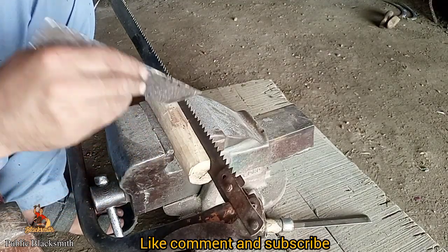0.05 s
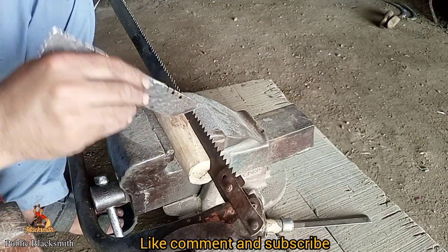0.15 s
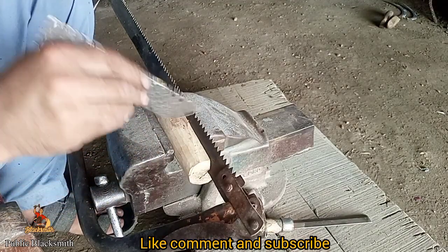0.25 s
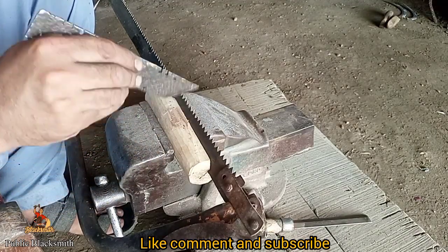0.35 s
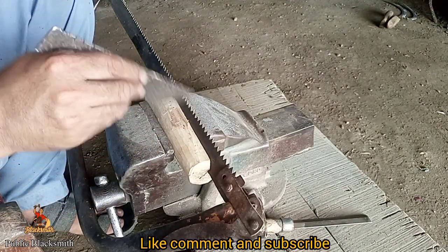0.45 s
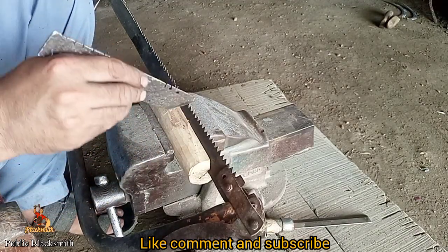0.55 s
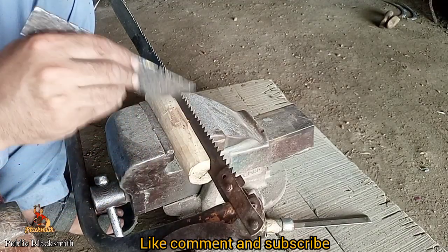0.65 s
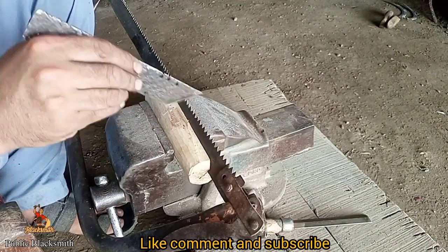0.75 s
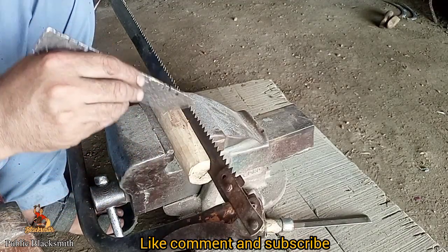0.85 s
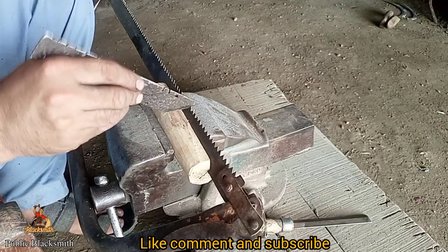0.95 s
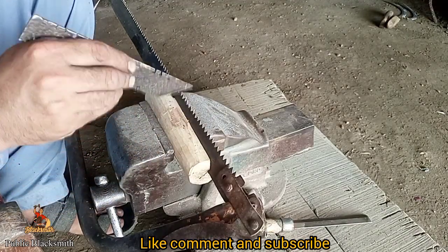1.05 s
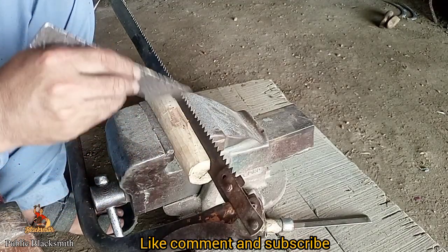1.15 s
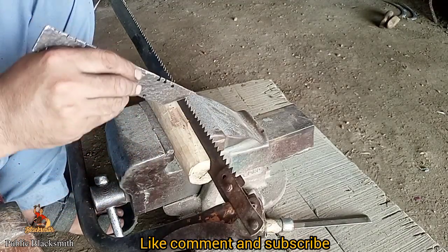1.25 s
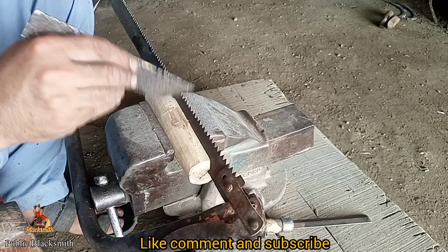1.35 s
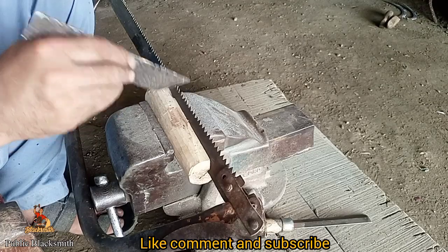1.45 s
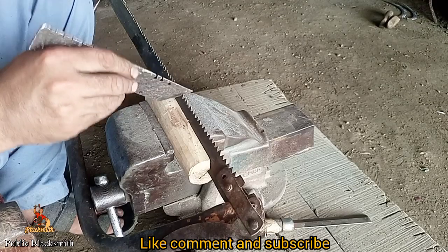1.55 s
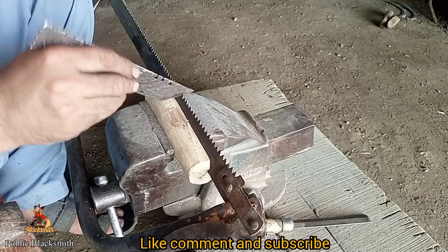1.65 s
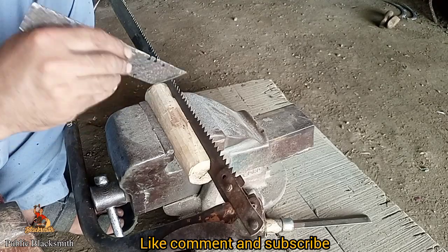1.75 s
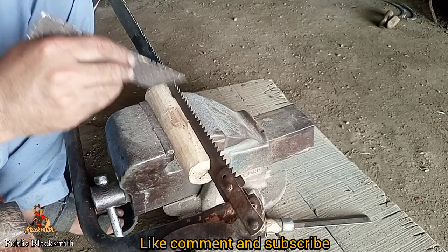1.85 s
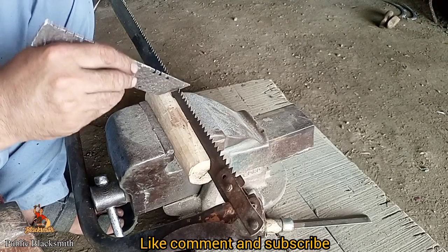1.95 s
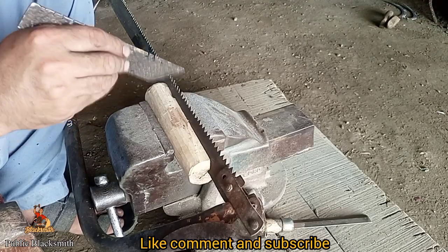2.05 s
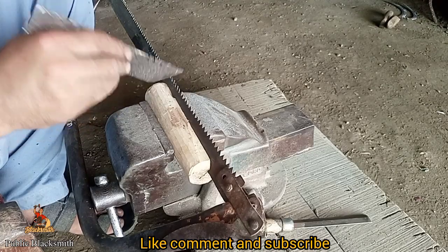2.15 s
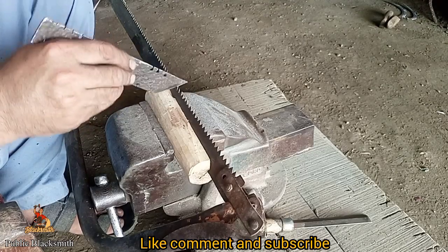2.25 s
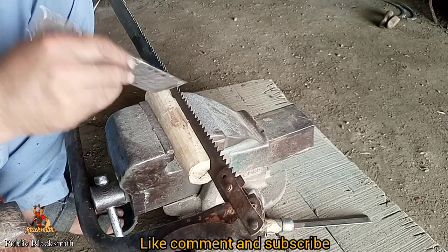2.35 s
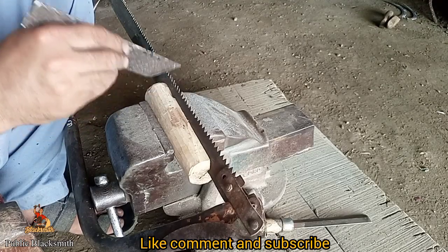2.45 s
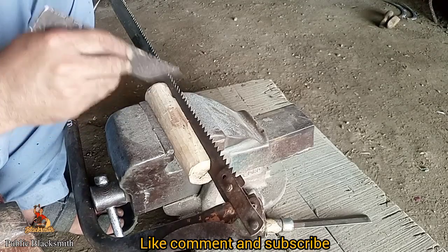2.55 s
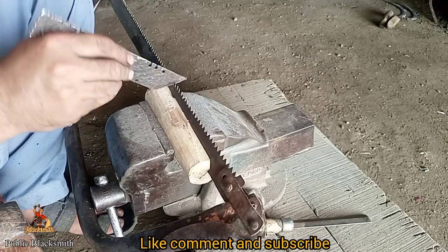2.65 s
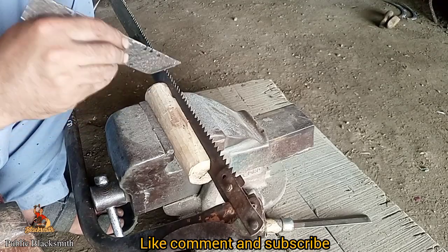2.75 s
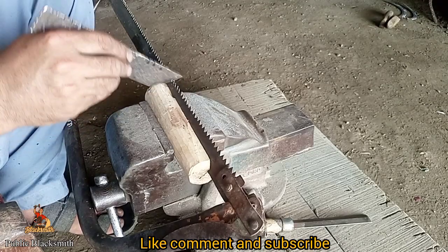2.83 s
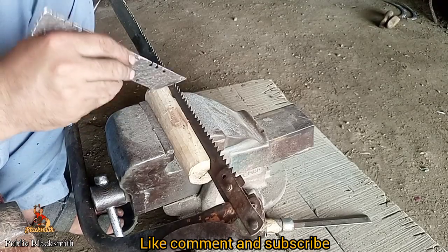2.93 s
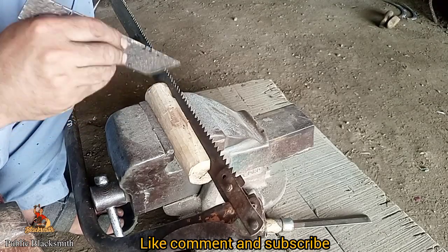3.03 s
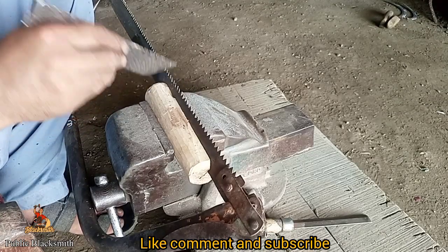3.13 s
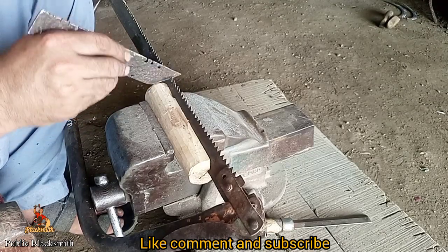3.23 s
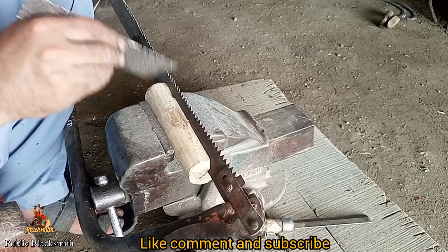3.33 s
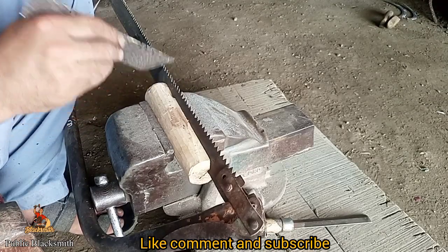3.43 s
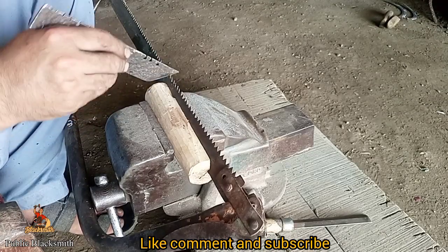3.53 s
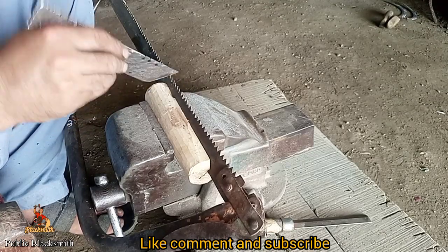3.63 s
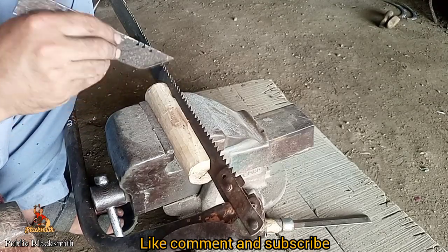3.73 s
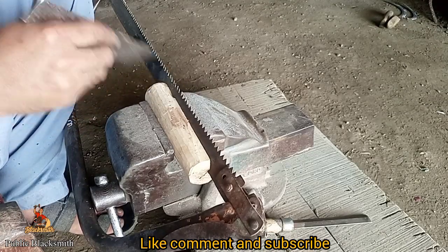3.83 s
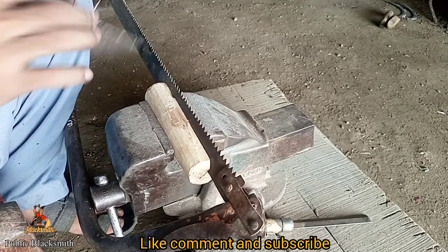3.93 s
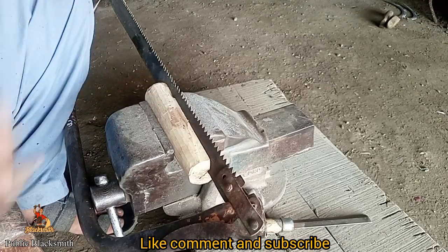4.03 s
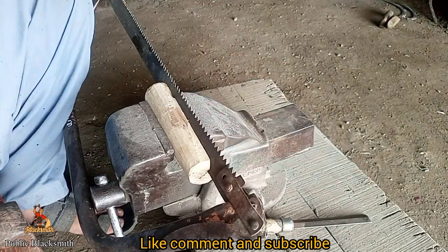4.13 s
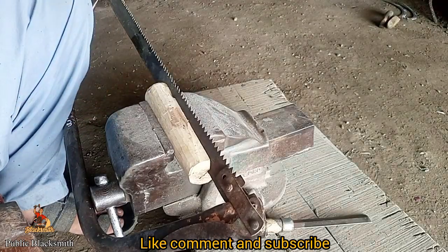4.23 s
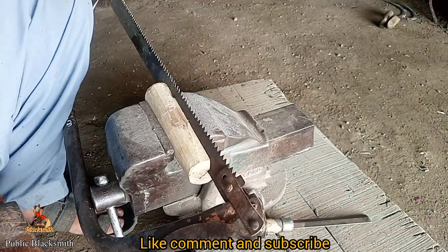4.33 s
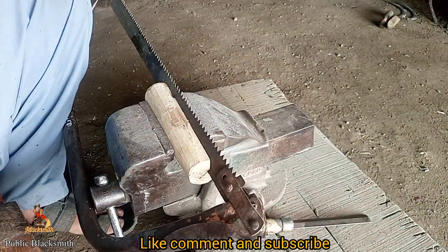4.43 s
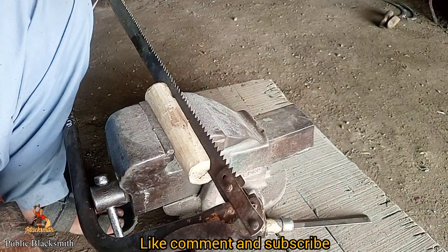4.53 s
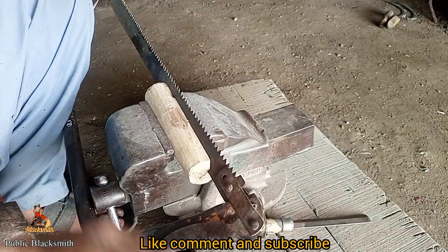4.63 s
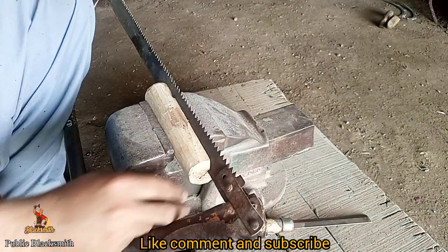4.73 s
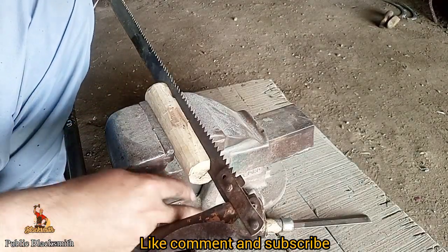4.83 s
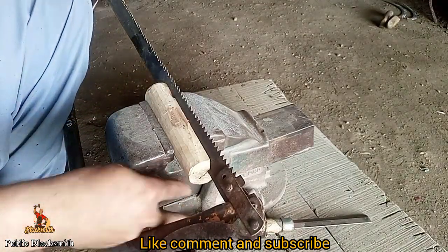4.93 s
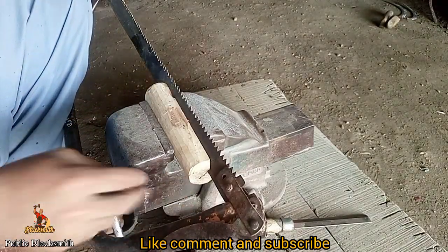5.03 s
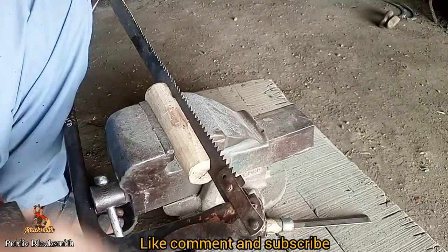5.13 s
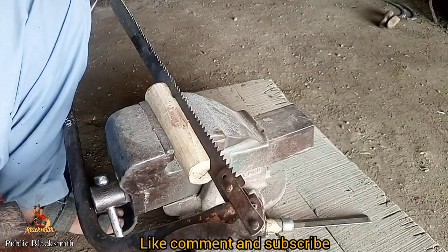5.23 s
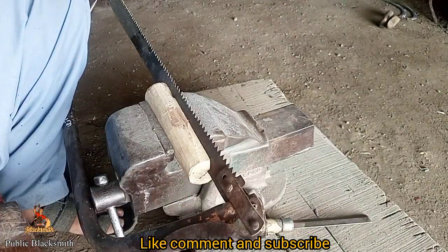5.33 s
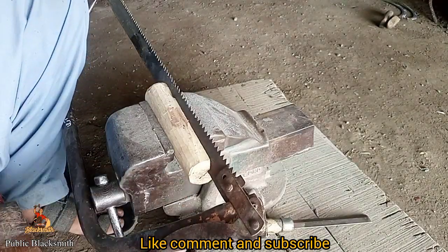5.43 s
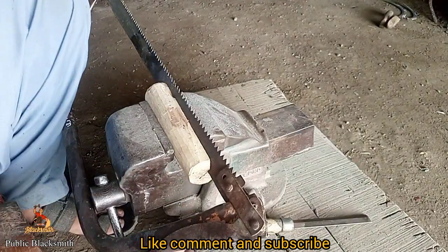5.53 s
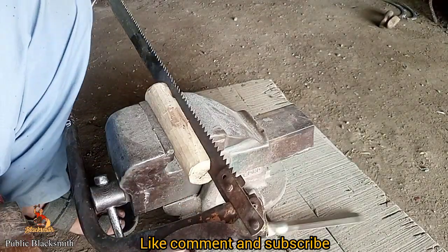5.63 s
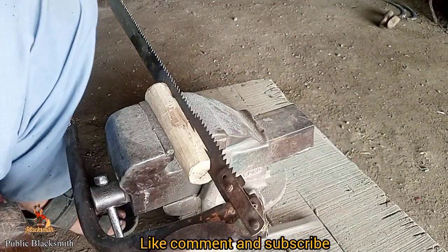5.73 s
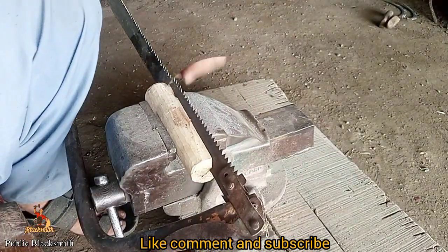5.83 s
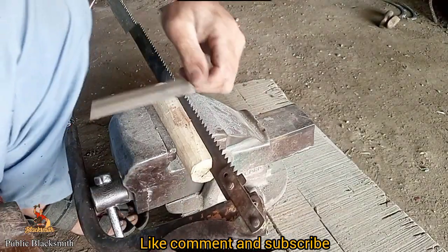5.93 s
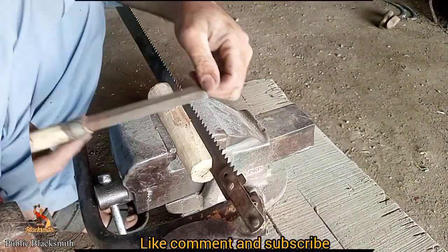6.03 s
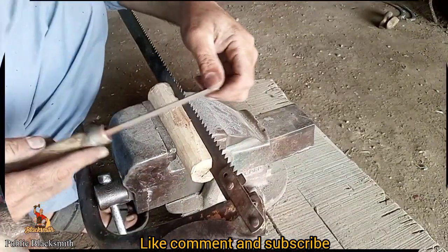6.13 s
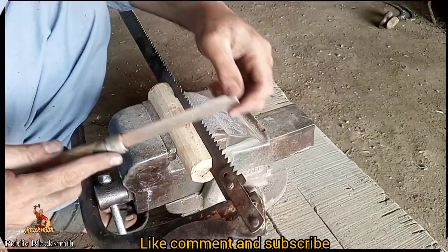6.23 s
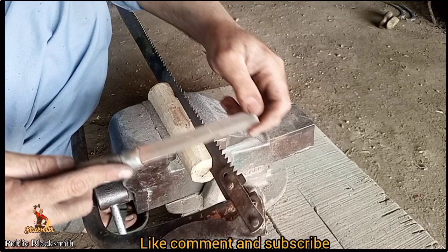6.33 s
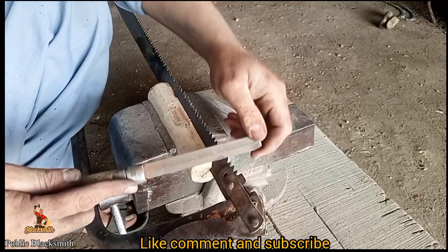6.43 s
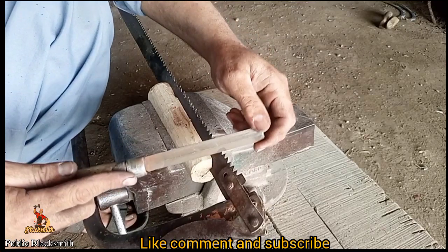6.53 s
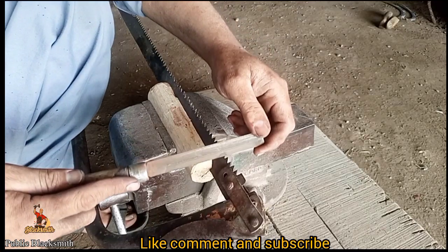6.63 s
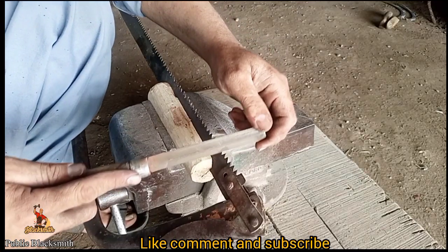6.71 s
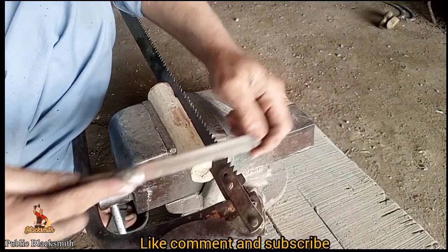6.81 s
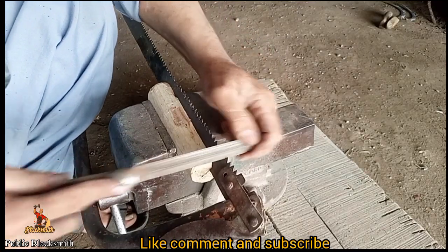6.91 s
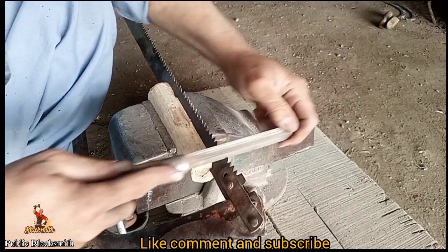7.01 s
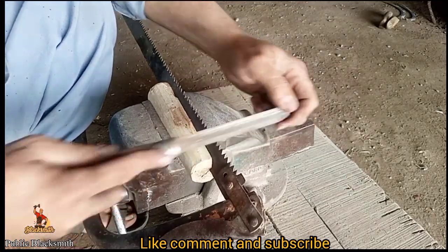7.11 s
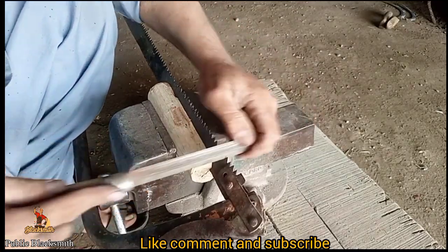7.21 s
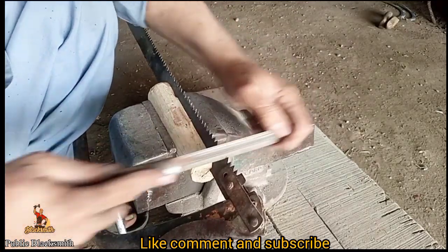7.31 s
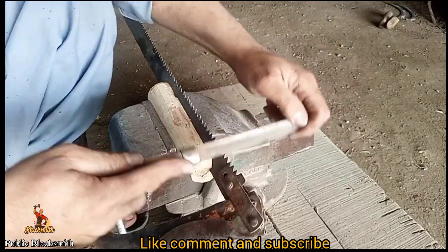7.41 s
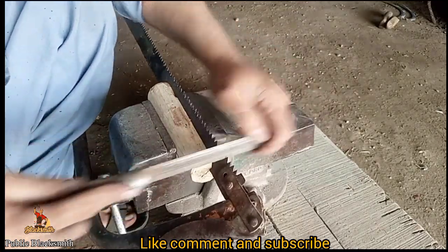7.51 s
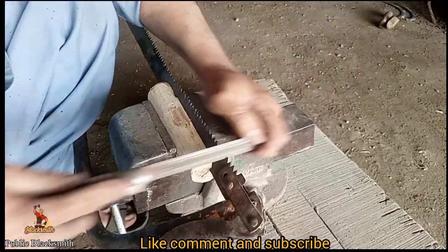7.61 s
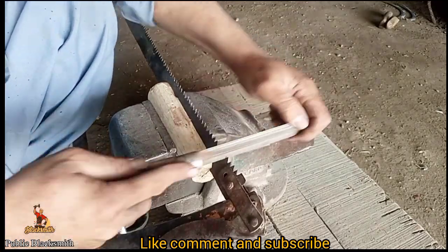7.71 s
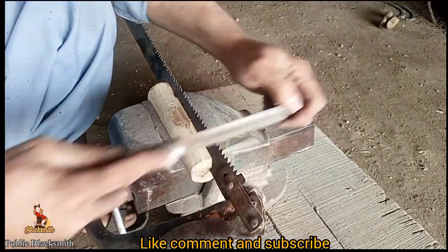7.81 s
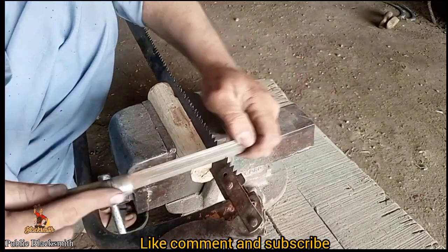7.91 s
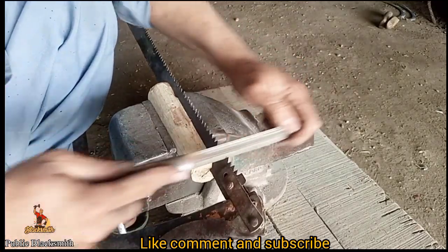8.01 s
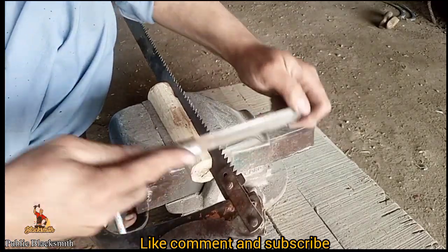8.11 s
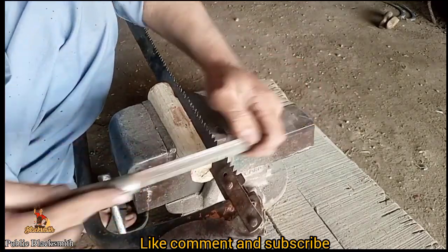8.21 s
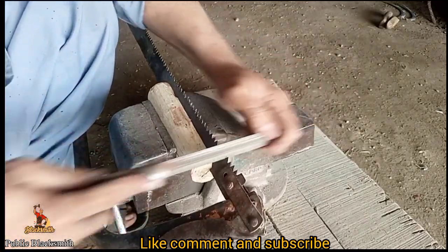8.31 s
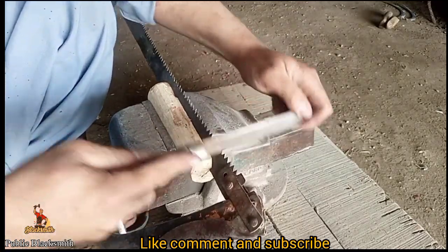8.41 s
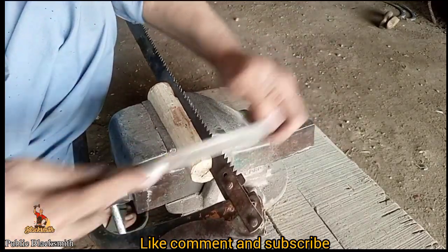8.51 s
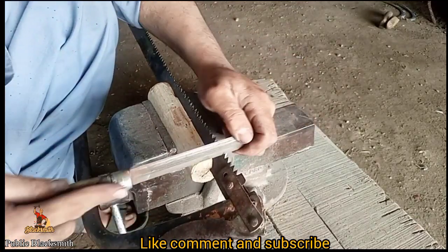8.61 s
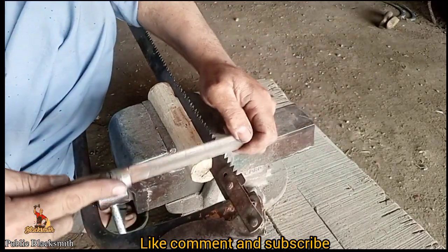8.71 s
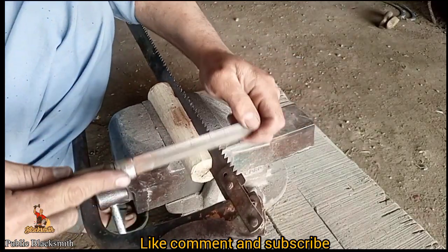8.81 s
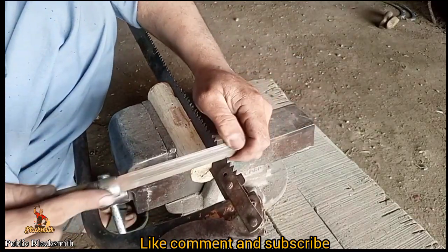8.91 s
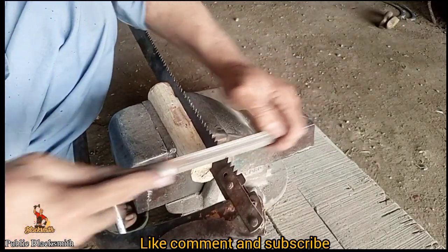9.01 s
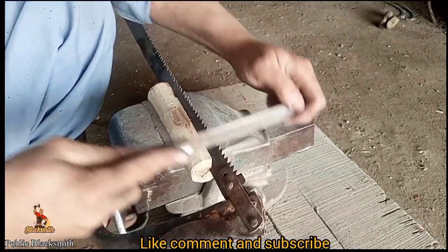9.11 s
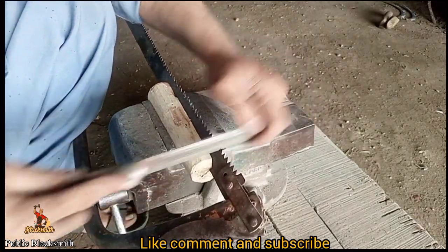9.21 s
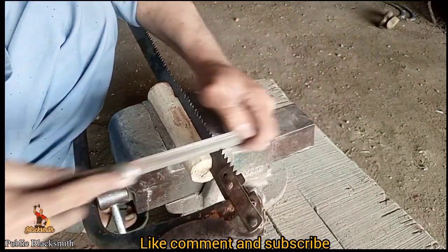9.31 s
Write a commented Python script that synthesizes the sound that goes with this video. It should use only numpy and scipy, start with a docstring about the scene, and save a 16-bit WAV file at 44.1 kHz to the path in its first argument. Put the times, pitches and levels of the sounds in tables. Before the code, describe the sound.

Quick gritty metal scratches tick steadily over a clamped saw blade, then a short clatter on the bench and slower, softer paired file rasps.

```python
"""Distant traffic, two wandering bands of low noise, rumbles under a small microphone's hiss throughout.
A flat steel plate pecks along the teeth of a saw held in a vice, each landing followed by a light drag: bursts of grit
ring the steel's modes, and slower low tones of the blade swell after each landing. A small tool rattles down on
the bench and a file is picked up, as short blows on their own modes. The file then lands on the teeth and is
pushed across them in longer bursts of grit. Gain control follows the recent power."""
import sys
import numpy as np
from scipy import signal
from scipy.fft import rfft, irfft
from scipy.io import wavfile
from scipy.ndimage import map_coordinates

SR = 44100
rng = np.random.default_rng(int(sys.argv[2]) if len(sys.argv) > 2 else 0)


def field_ratio(decibels):
    """Amplitude ratio for a level in dB (20 dB per decade); scalars and array-likes work."""
    return 10 ** (np.asarray(decibels, dtype=float) / 20)


def waveform_to_disk(signal):
    """Save audio, clipped to [-1, 1], as 16-bit WAV at the path in sys.argv[1]."""
    frames = np.transpose(np.atleast_2d(signal))
    scaled = np.clip(frames, -1, 1) * 32767
    samples = np.round(scaled).astype(np.int16)
    wavfile.write(sys.argv[1], SR, samples)


N = 412776
CONTACT_SIZE = 2 ** 14  # samples in one contact or tone

# plate lands on a tooth: start_s, level_db, rise_s, hold_s, fall_t60_s
PECKS = [(.032, -31.5, 0.0071, 0, 0.099), (.176, -31, 0.0027, 0.0005, 0.095),
         (.313, -31, .0034, 0.00056, 0.11), (0.446, -35, 0.0071, .0074, .091),
         (.591, -36, .0023, 0.019, .076), (.733, -29.5, 0.0053, 0, 0.1), (0.871, -38.5, 0.0078, 0, 0.073),
         (1.014, -35.5, .0026, 0.015, 0.062), (1.15, -30.5, .0036, 0, 0.085),
         (1.283, -35, 0.0067, 0.0058, .12), (1.432, -35, 0.0035, 0.0095, 0.078),
         (1.576, -34.5, 0.0056, .0053, 0.077), (1.709, -31, 0.005, 0.00029, 0.11),
         (1.861, -32.5, .0051, 0, .08), (1.996, -38, .014, 0.0016, .058),
         (2.144, -37.5, 0.0062, 0.0057, 0.13), (2.286, -32, 0.0067, 0, 0.069),
         (2.43, -35.5, .0026, 0.0065, 0.071), (2.565, -35, 0.0066, 0.00044, .089),
         (2.7, -36, 0.0022, 0.011, 0.07), (2.843, -34.5, 0.0056, 0.0021, 0.096),
         (3.001, -34, .0033, 0.009, 0.052), (3.141, -32, 0.0034, 0.0024, 0.077),
         (3.273, -35.5, 0.0083, .011, 0.063), (3.411, -33, 0.0061, 0.0057, 0.086),
         (3.563, -42, 0.005, 0.003, 0.082), (3.697, -42, 0.016, 0, 0.092), (3.83, -36, 0.0027, .016, 0.13)]
# file is pushed across the teeth: start_s, level_db, rise_s, hold_s, fall_t60_s
STROKES = [(6.969, -36.5, 0.054, 0.0094, 0.2), (7.319, -46, 0.052, 0.058, 0.13),
           (7.654, -44.5, 0.07, 0.043, 0.14), (8.013, -46.5, .022, 0.09, .2),
           (8.347, -46, 0.038, 0.067, .15), (8.627, -37.5, 0.0052, 0.025, .12),
           (9.005, -46, 0.072, 0.057, 0.13)]
# file is set down on the teeth: start_s, level_db, rise_s, hold_s, free_end_tone_db
LANDINGS = [(6.111, -48.5, 0.011, .001, -89), (6.882, -42.5, 0.011, 0.04, -64),
            (7.259, -40, 0.0015, 0.014, -77), (7.596, -42, 0.0089, 0.018, -51),
            (7.935, -38.5, .006, 0.023, -59), (8.28, -37, .0028, 0.0027, -59),
            (8.6, -41, 0.0046, 0.0079, -50.5), (8.933, -39.5, 0.0037, .001, -64),
            (9.291, -37.5, .018, 0.015, -72)]
# dense response between the modes, plate and file handle: pitch_hz, relative_level_db
DENSE_STEEL = [(200, -49), (350, -23), (620, -23), (850, -6.5), (1130, -16.5), (1290, -1.5), (1830, -12),
               (4170, -3), (7000, -6.5), (8200, -19.5), (12600, -28.5), (14200, -34), (15200, -20),
               (15800, -47.5)]


def unit(x):
    """Scaled to rms 1."""
    return x / np.sqrt(np.mean(x ** 2) + 1e-20)


def along(points, hz):
    """Interpolates (Hz, value) points on a log frequency axis."""
    f, v = np.transpose(points)
    return np.interp(np.log(hz + 1), np.log(f + 1), v)


def place(table, s):
    """Columns of a table interpolated at one moment."""
    at, *cols = np.transpose(table)
    return [np.interp(s, at, c) for c in cols]


def wobble(rate, size=N):
    """A smooth random curve, rate knots a second."""
    knots = rng.standard_normal(int(size * rate / SR) + 4)
    return map_coordinates(knots, [np.arange(size) * rate / SR])


def coloured(spectrum):
    """Steady noise of rms 1, shaped by (Hz, dB) points."""
    gain = field_ratio(along(spectrum, np.fft.rfftfreq(N, 1 / SR)))
    return unit(irfft(rfft(rng.standard_normal(N)) * gain, N))


def causal(gain_db):
    """Minimum-phase response with these gains: starts at once, never early."""
    cepstrum = irfft(gain_db * np.log(10) / 20)
    half = len(cepstrum) // 2
    cepstrum[1:half] *= 2
    cepstrum[half + 1:] = 0
    return np.exp(rfft(cepstrum))


def envelope(t, rise_s, hold_s, t60_s):
    """A smooth rise, a hold, an exponential fall."""
    rising = np.sin(np.clip(t / max(rise_s, 1e-4), 0, 1) * np.pi / 2) ** 2
    return rising * field_ratio(-60 * np.clip(t - rise_s - hold_s, 0, None) / t60_s)


def tint(low_db, deep_db, mid_db, bright_db):
    """Colour of a contact on the blade: under 1 kHz, extra under 600 Hz, near 1.3 kHz, from 6 kHz."""
    return [(600, low_db + deep_db), (700, low_db), (1000, low_db), (1200, mid_db), (1500, mid_db),
            (2000, 0), (3000, 0.0075), (6000, bright_db)]


def contacts(rows, modes, dense, grit_db, flutter_db, mode_scatter_db, ripple_db, ripple_hz,
             dense_db, snap_db, top_db):
    """Bursts of grit ring a body's modes, at new strengths as the contact point moves.
    rows: (start_s, level_db, rise_s, hold_s, t60_s, colour points)."""
    size = CONTACT_SIZE
    out, t, hz = np.zeros(N + size), np.arange(size) / SR, np.fft.rfftfreq(size, 1 / SR)
    centre, width, mode_db = np.transpose(modes)[:, :, None]
    rings = field_ratio(mode_db) * 1j * hz * width / (centre ** 2 - hz ** 2 + 1j * hz * width)
    rings[::2] *= -1
    skirts = [(250, -9.0), (420, 1.5), (7200, 2.0), (9000, -11), (14000, -21)]  # steep falls at both ends
    rings *= causal(along(skirts, hz))
    top = along([(7400, 0), (8400, 0.9)], hz)
    fade_out = np.clip((t[-1] - t) / .1, 0, 1)
    for s, db, rise_s, hold_s, t60_s, colour in rows:
        pressure = envelope(t, rise_s, hold_s, t60_s)
        roughness_db = grit_db * wobble(1500, size=size) + flutter_db * wobble(116, size=size)
        force = pressure * rng.standard_normal(size) * field_ratio(roughness_db)
        force *= np.linalg.norm(pressure) / np.linalg.norm(force)
        if rise_s < .008:  # a quick landing snaps
            force += field_ratio(snap_db - 60 * np.abs(t - rise_s) / 0.00054)
        # many small modes of thin steel
        crowd_db = ripple_db * map_coordinates(rng.standard_normal(len(hz)), [hz / ripple_hz])
        crowd_db += 2.5 * map_coordinates(rng.standard_normal(len(hz)), [hz / 700])
        body = causal(along(dense, hz) + dense_db + crowd_db)
        body = body + field_ratio(mode_scatter_db * rng.standard_normal(len(modes))) @ rings
        body = body * causal(along(colour, hz))
        spectrum = rfft(force) * body / np.sqrt(np.mean(np.abs(body) ** 2))
        # the highest treble fades sooner than the rest
        treble_fade = (field_ratio(db + 38.5) * np.maximum(pressure, t < rise_s)) ** 0.25
        treble = field_ratio(top_db) * treble_fade * irfft(spectrum * top, size)
        sound = irfft(spectrum * (1 - top), size) + treble
        out[round(s * SR):][:size] += field_ratio(db) * sound * fade_out
    return out[:N]


def background():
    """Traffic wanders in two low noise bands, one swollen by a heavy vehicle; the hiss barely wavers."""
    # traffic band: pitch_hz, relative_level_db
    traffic = [(15, -61), (25, -31), (37, -25), (46, -9), (59, -6.5), (113, 1), (151, -9), (226, -10),
               (266, -15.5), (318, -10), (350, -20.5), (440, -18), (1200, -29), (1560, -45), (2640, -120)]
    # microphone hiss: pitch_hz, relative_level_db
    mic_hiss = [(410, -30), (700, -9), (810, -11), (1410, -7), (1550, -7.5), (3000, -14.5), (5960, -15),
                (9220, -35.5), (16500, -37)]
    pass_s, pass_db, pass_width_s = 1.3, 14.5, 0.22
    swell_db = pass_db * np.exp(-((np.arange(N) / SR - pass_s) / pass_width_s) ** 2)
    deep = coloured([(25, -15.5), (45, -15.5), (65, 4.5), (80, 3.0), (100, -28), (150, -67.5)])
    deep = deep * field_ratio(-73.5 + swell_db + 1.5 * wobble(3.3))
    rumble = coloured([(60, -60.5), (85, -11)] + traffic[4:])
    rumble = rumble * field_ratio(-68 + 1.8 * wobble(3.066) + 1.2 * wobble(8.9))
    return deep + rumble + field_ratio(-78.5 + .5 * wobble(5)) * coloured(mic_hiss)


def plate():
    """The plate lands on a tooth, then drags back off it; grit excites the modes of blade and plate."""
    # plate drags off the tooth: start_s, level_db, length_s, fall_t60_s
    drags = [(0, -69.5, 0.00082, 0.11), (0.062, -52.5, 0.037, 0.097), (0.227, -46, .016, 0.072),
             (0.361, -50.5, 0.016, 0.073), (0.498, -44.5, 0.0056, .11), (0.649, -47.5, .006, 0.091),
             (.774, -50.5, 0.029, 0.075), (0.917, -49, 0.019, 0.08), (1.06, -47, 0.017, 0.062),
             (1.204, -52, 0.017, 0.089), (1.319, -57.5, 0.018, 0.13), (1.484, -48, 0.02, 0.057),
             (1.622, -52.5, 0.017, 0.15), (1.773, -45, 0.0114, .07), (1.883, -58.5, .04, 0.14),
             (2.031, -57.5, 0.033, .092), (2.19, -56, 0.011, 0.13), (2.334, -56, .009, 0.15),
             (2.457, -56.5, 0.037, 0.094), (2.607, -52, 0.015, 0.13), (2.727, -56, 0.043, 0.1),
             (2.884, -55, 0.02, 0.12), (3.023, -54.5, 0.039, 0.088), (3.168, -51, 0.032, 0.08),
             (3.312, -47, .031, 0.06), (3.441, -46.5, 0.039, 0.083), (3.61, -60, 0.023, .044),
             (3.758, -56, 0.016, 0.057), (3.886, -43.5, 0.014, 0.064)]
    # plate works along, freeing the blade's lows: time_s, under_1khz_db, under_600hz_extra_db, brightness_db
    freeing = [(0, -11, -10.5, -10), (.25, -1, -10.5, -4.5), (.75, -2, -1.5, -7.5), (.9, -13, -0.5, -5),
               (1.7, -10, 8.5, -2), (2.3, -8.5, 6, -1.5), (2.7, -12, 8.5, -2), (3.2, -6.5, 7.5, -1),
               (3.45, -10.5, 15, -5), (3.9, -9, 12.5, -4)]
    # saw blade and plate modes: pitch_hz, width_hz, level_db
    blade_modes = [(807, 19, -17.5), (1322, 45, 1.5), (1397, 19, -3), (1500, 40, -11), (1667, 38, 4),
                   (2064, 110, -8.5), (2288, 70, -2), (2596, 39, -1), (2800, 110, -2.5), (3060, 11, -4.5),
                   (3540, 100, -11), (3610, 60, -2.5), (4048, 74, 8), (4800, 30, -9), (4980, 35, 0),
                   (5974, 270, -1), (5600, 48, 1), (6670, 260, -3), (7910, 44, -16.5), (8140, 57, -16),
                   (10900, 80, -2)]
    press_share = .75  # part of a drag spent pressing in

    def colour(s, low_db, bright_db):
        low, deep, bright = place(freeing, s)
        mid_db = -3.5 + 1 * s  # grows 1 dB/s as the plate moves on
        return tint(low + low_db, deep, mid_db, bright + bright_db)

    rows = [(*row, colour(row[0], 0, 0)) for row in PECKS]
    for s, db, length_s, t60_s in drags:
        low_db = 6 - .5 * (db + 51)  # weaker drags sound relatively lower, from the blade's ringing lows
        rows.append((s, db, press_share * length_s, (1 - press_share) * length_s, t60_s,
                     colour(s, low_db, bright_db=-4)))
    return contacts(rows, blade_modes, DENSE_STEEL, grit_db=3.5, flutter_db=2.2, mode_scatter_db=4,
                    ripple_db=4.5, ripple_hz=50, dense_db=0.0, snap_db=-4.5, top_db=1.5)


def blade_tones():
    """Contacts swell low blade modes: tones wavering in level and phase, as scraping keeps feeding them."""
    # main low tone at a landing: time_s, level_relative_to_landing_db
    main_tone = [(0, -45), (.31, -21.5), (.59, -27.5), (.73, -23.5), (.87, -40), (1.28, -34.5),
                 (1.43, -25.5), (1.71, -35), (2.29, -33), (2.43, -24), (3.0, -22.5), (3.14, -28),
                 (3.41, -24), (3.7, -31), (3.83, -16.5)]
    # the free end sounds lower as the plate leaves it: time_s, pitch_hz, level_db
    free_end = [(0, 664, -79), (.7, 660, -67), (1, 690, -75), (1.6, 653, -63.5), (1.9, 711, -64.5),
                (2.3, 634, -75.5), (2.6, 550, -65), (2.9, 570, -67), (3.2, 630, -68.5), (3.42, 433, -67),
                (3.6, 518, -68), (3.9, 426, -54)]
    size = CONTACT_SIZE
    out, t = np.zeros(N + size), np.arange(size) / SR
    tones = []  # start_s, level_db, pitch_hz, delay_s, rise_s, t60_s
    for s, db, *_ in PECKS:
        ring_s = 0.12 * (1 + 0.27 * s)  # lasts longer as the plate frees more blade
        tones.append((s, db + place(main_tone, s)[0], 804, .016, 0.019, ring_s))
        end_hz, end_db = place(free_end, s)
        tones.append((s, end_db, end_hz, 0.0094, .027, 0.078))
    for s, *_, end_db in LANDINGS:
        tones.append((s, end_db, 442.4, 0.01017, 0.011, 0.13))
    for s, _, rise_s, hold_s, _ in STROKES:
        push_db = -50.5 - 4 * (s - STROKES[0][0])  # fades 4 dB/s as the file bites
        tones.append((s, push_db, 1008, rise_s / 2, 0.031, 2.3 * (rise_s + hold_s)))
    for s, db, hz, delay_s, rise_s, t60_s in tones:
        hz = hz * (1 + .012 * rng.standard_normal())
        tone = np.sin(2 * np.pi * hz * t + wobble(65, size=size)) * field_ratio(3 * wobble(80, size=size))
        swell = envelope(t, rise_s, 0.0035, t60_s)
        out[round((s + delay_s) * SR):][:size] += field_ratio(db) * np.sqrt(2) * swell * tone
    return out[:N]


def knocks():
    """Blows are short contacts favouring modes near their centre; softer grit shuffles between them."""
    # small tool knocks: start_s, level_db, centre_hz, loss_db_per_octave, fall_t60_s
    rattle = [(4.544, -44.5, 1710, 20, 0.035), (4.570, -35, 1170, 10, 0.051), (4.580, -37, 500, 6, 0.022),
              (4.590, -42, 655, 6, .051), (4.605, -28.5, 1610, 4.5, 0.024), (4.618, -41, 1300, 7, .022),
              (4.626, -29.5, 3500, 5.5, 0.025), (4.640, -36, 795, 6, 0.036), (4.653, -32, 6500, 4, 0.02),
              (4.668, -29.5, 6000, 4.5, 0.024), (4.688, -32.5, 5800, 2.5, 0.026),
              (4.703, -35.5, 1580, 16, .021), (4.715, -44, 400, 2, 0.018), (4.722, -38.5, 1500, 22, 0.06),
              (4.760, -59, 1500, 10, 0.045), (4.777, -61, 1500, 25, 0.037)]
    # file and handle knocks: start_s, level_db, centre_hz, loss_db_per_octave, fall_t60_s
    handling = [(5.464, -60.5, 2900, 17, 0.073), (5.737, -42, 774, 12, 0.031), (5.765, -55, 764, 9, .11),
                (5.797, -48, 775, 10, .048), (5.815, -55, 800, 10, .11), (5.843, -47.5, 447, 19, 0.084),
                (5.860, -50, 500, 11, 0.081), (5.914, -49.5, 1480, 17, 0.027), (5.935, -57, 1480, 26, 0.05),
                (6.255, -70, 1200, 12, .25)]
    # small tool on the bench, modes: pitch_hz, width_hz, level_db
    tool_modes = [(328, 18, 5), (800, 66, -2), (987, 44, -5.5), (1266, 32, -7), (1372, 29, 4),
                  (1520, 36, 2), (1736, 71, 2.5), (2340, 44, -7), (2720, 48, -4.5), (2930, 59, -5),
                  (3570, 64, -29), (4080, 22, 0), (4463, 27, -16), (5550, 30, -4.5), (6060, 23, -3.5),
                  (6540, 60, -12), (7060, 39, -8.5), (7950, 36, -8.5), (8720, 28, -13), (9700, 25, -12),
                  (10400, 33, -10), (11400, 30, -20.5)]
    # file with wooden handle, modes: pitch_hz, width_hz, level_db
    handle_modes = [(447, 22, -8.5), (658, 26, -5), (764, 28, -1), (1270, 44, -14), (1480, 62, -5.5),
                    (1770, 78, -13.5), (2300, 30, -8.5), (3590, 54, -8), (4590, 61, -14), (5800, 77, -24),
                    (6300, 52, -12), (7080, 97, -18)]
    # dense response between the tool's modes: pitch_hz, relative_level_db
    dense_tool = [(150, -74), (250, -2), (342, 2), (503, -8.5), (1520, 0), (4060, -1.5), (7000, -19),
                  (8500, -42), (12300, -57), (15000, -30), (15800, -64)]

    def blows(rows, rise_s):
        return [(s, db, rise_s, 0, t60_s, [(hz / 8, -3 * loss_db), (hz, 0), (hz * 8, -3 * loss_db)])
                for s, db, hz, loss_db, t60_s in rows]

    chance = dict(grit_db=2, flutter_db=1.5, mode_scatter_db=1.5, ripple_db=3, ripple_hz=80)
    shuffle = [(4.57, -48, 0.067, 0.077, 0.1, [(1000, 0), (4000, -2)])]
    rustle = [(5.74, -70, 0.065, 0.073, 0.092, [(1000, 2.2), (2400, 0)])]
    tool = contacts(blows(rattle, rise_s=0.00038) + shuffle, tool_modes, dense_tool, **chance,
                    dense_db=-10.5, snap_db=7, top_db=1.5)
    handle = contacts(blows(handling, rise_s=0.00147) + rustle, handle_modes, DENSE_STEEL, **chance,
                      dense_db=-22.5, snap_db=1.0, top_db=8)
    return tool + handle


def file_on_teeth():
    """The file's many teeth chatter over the saw's: grit excites the modes of blade and file."""
    # late catches on the teeth, end of a push or the file lifting off: start_s, level_db
    late_catches = [(7.065, -48), (7.115, -59.5), (7.48, -58.5), (7.812, -60), (9.162, -54.5)]
    # file's edge touches the blade: start_s, level_db, fall_t60_s
    ticks = [(6.087, -55.5, 0.045), (6.498, -42.5, 0.028)]
    # saw blade and file modes: pitch_hz, width_hz, level_db
    file_modes = [(1317, 83, 0.5), (1537, 12, -20.5), (1720, 14, -6), (1870, 20, -28), (2390, 67, -1),
                  (2700, 46, -13), (2926, 45, 4), (3716, 24, -20), (4210, 160, 2.5), (5020, 89, -4),
                  (6000, 200, 2.5), (6860, 220, -10), (7310, 110, -7), (8700, 59, -15)]
    # dense response between the modes: pitch_hz, relative_level_db
    dense_file = [(200, -53), (330, -24), (450, -13), (670, -23.5), (980, -6.5), (1150, -38), (1380, 1.5),
                  (2440, -10), (7100, -6), (8200, -19.5), (12600, -30.5), (14200, -34), (15200, -16),
                  (15800, -56.5)]
    rows = [(s, db, rise_s, hold_s, 0.12, tint(-1.5, -0.5, -2, -5)) for s, db, rise_s, hold_s, _ in LANDINGS]
    rows += [(*row, tint(7.5, -3.5, -3, -3.5)) for row in STROKES]
    rows += [(s, db, 0.0094, 0.0081, .05, tint(2, -2, 2.5, 0)) for s, db in late_catches]
    rows += [(s, db, .0015, 0, t60_s, tint(-5, 1, -4, -1)) for s, db, t60_s in ticks]
    return contacts(rows, file_modes, dense_file, grit_db=4, flutter_db=1.6, mode_scatter_db=3.5,
                    ripple_db=3.5, ripple_hz=45, dense_db=3.5, snap_db=-16, top_db=-0.5)


def scene():
    """All sources summed to one channel."""
    return (background() + plate() + blade_tones() + knocks() + file_on_teeth())[None]


def roll_off(x):
    """The treble ends steeply here."""
    return signal.sosfilt(signal.butter(12, 16790, fs=SR, output="sos"), x)


def record(dry):
    """Gain control turns down a little after loud moments and recovers slowly."""
    memory = np.exp(-np.arange(SR) / (.12 * SR))  # 0.12 s time constant
    power = signal.fftconvolve(dry[0] ** 2, memory / memory.sum())[:N]
    gain = (1 + np.abs(power) / field_ratio(-42.5) ** 2) ** -.15
    return roll_off(dry * gain * field_ratio(0.5))


dry = scene()
out = record(dry)
waveform_to_disk(out)
```